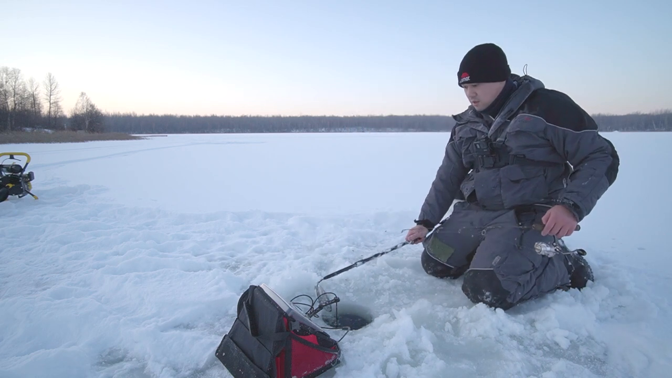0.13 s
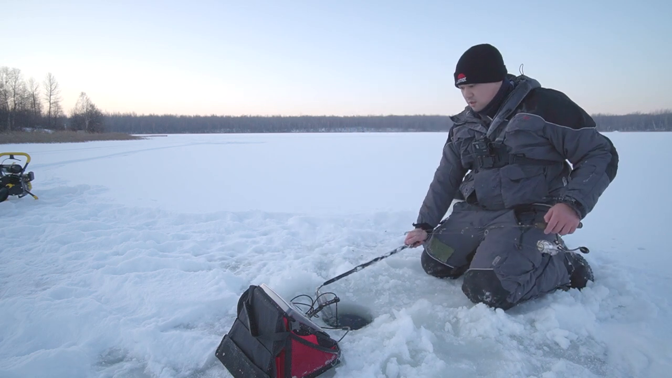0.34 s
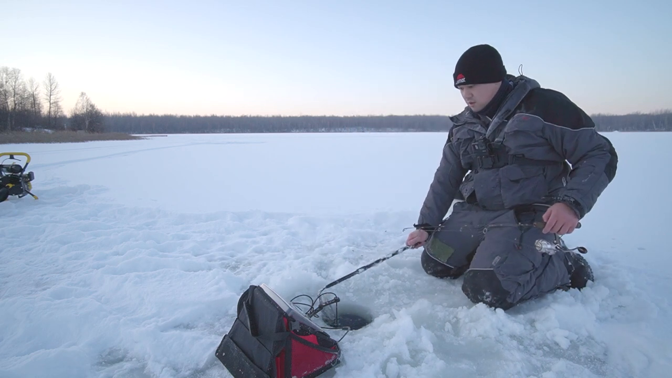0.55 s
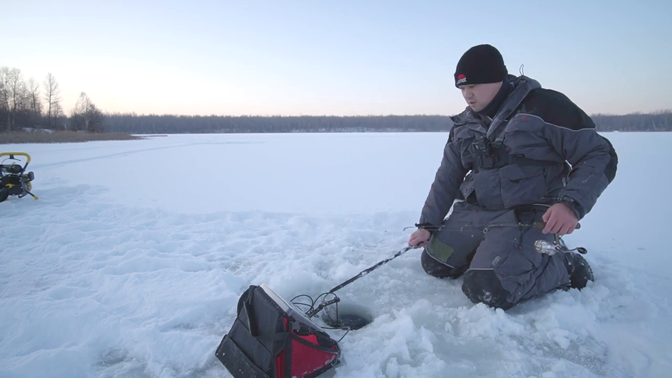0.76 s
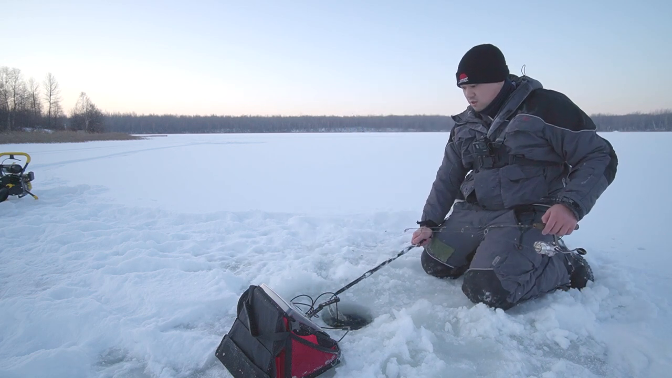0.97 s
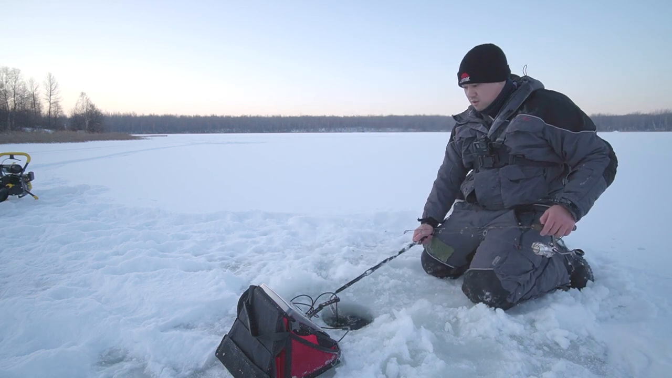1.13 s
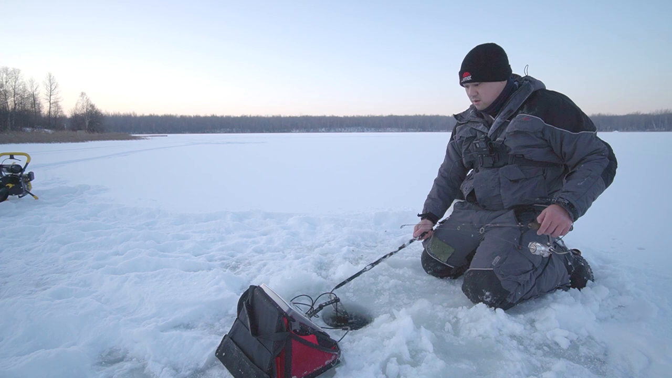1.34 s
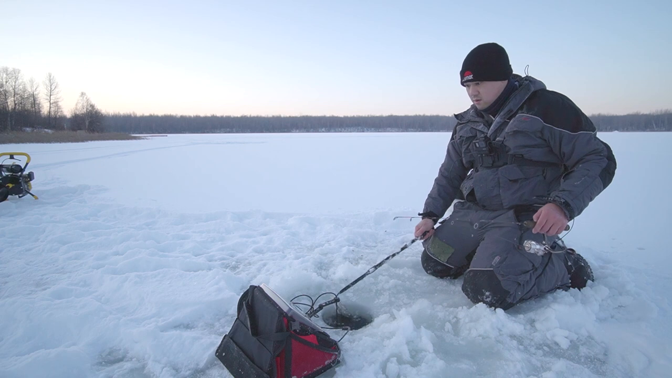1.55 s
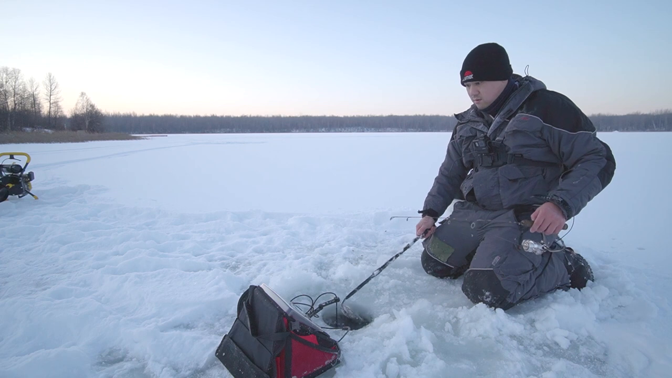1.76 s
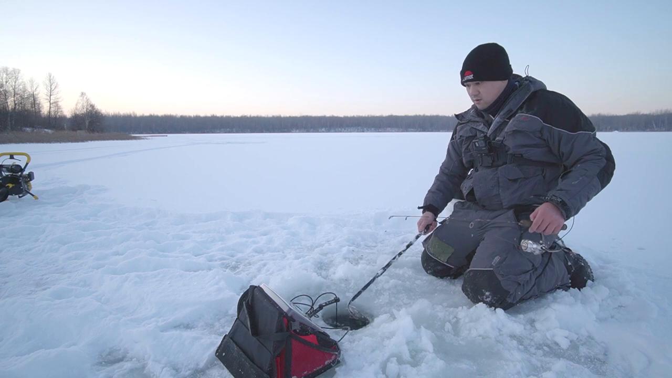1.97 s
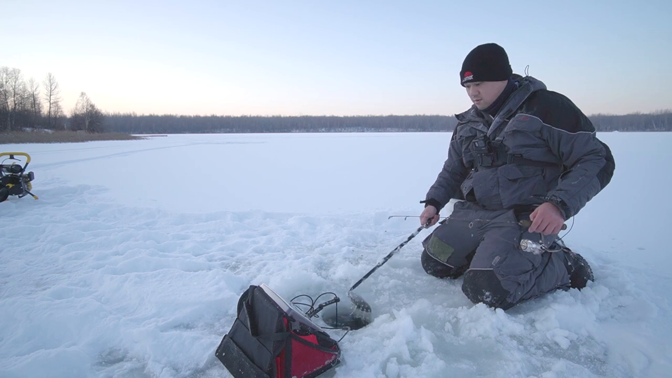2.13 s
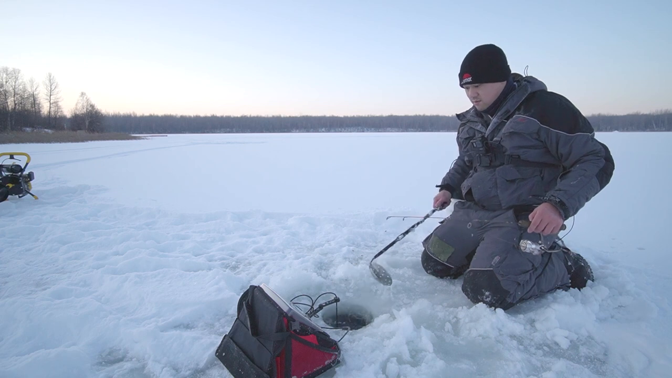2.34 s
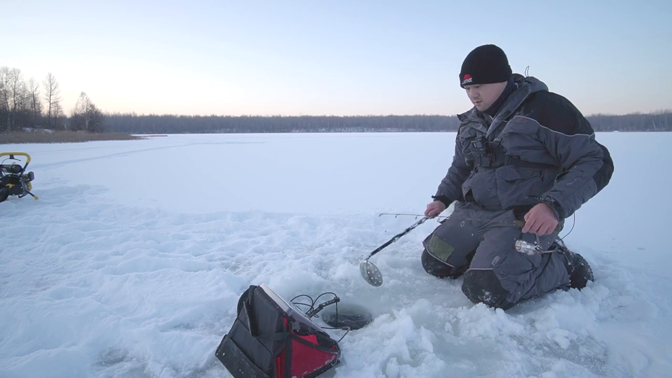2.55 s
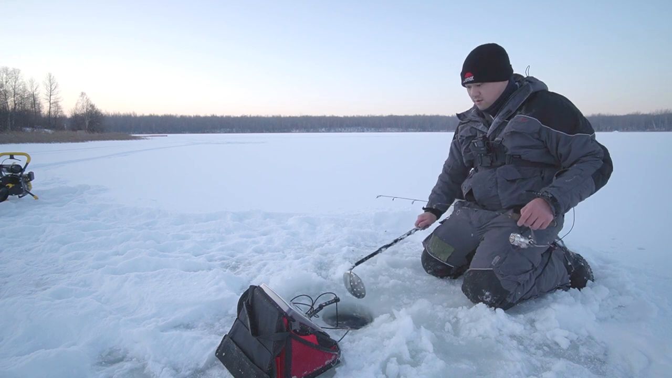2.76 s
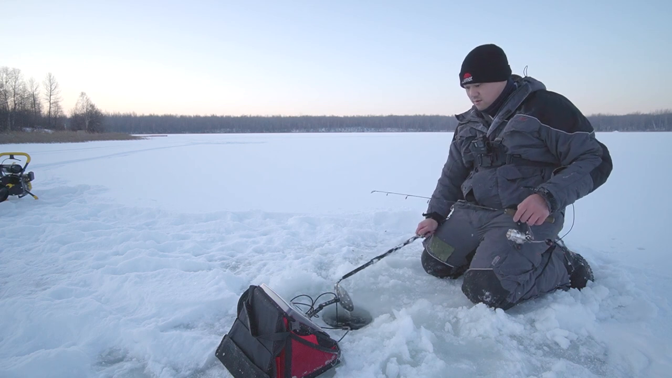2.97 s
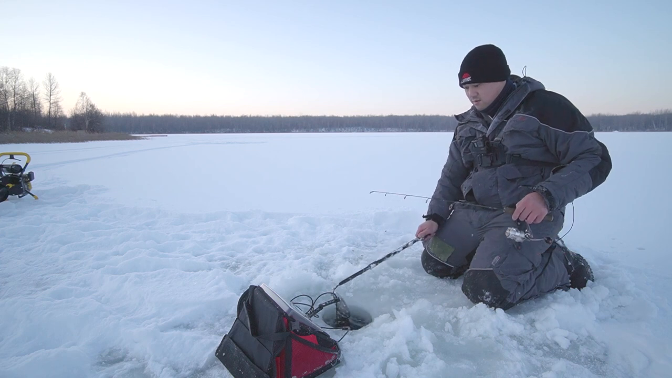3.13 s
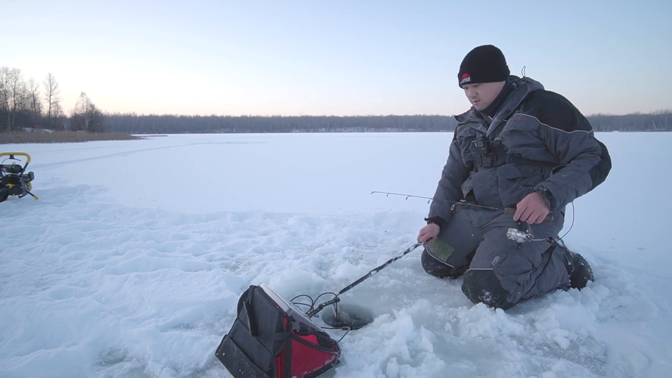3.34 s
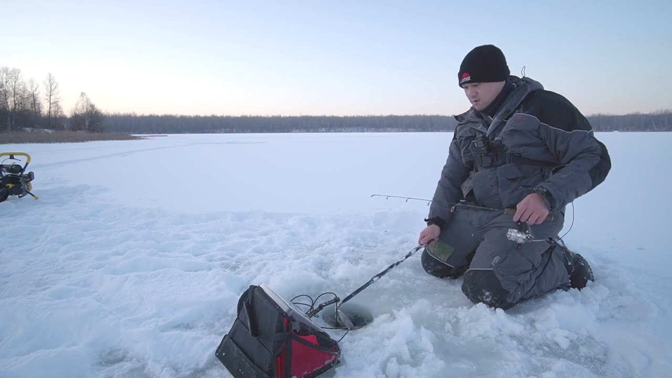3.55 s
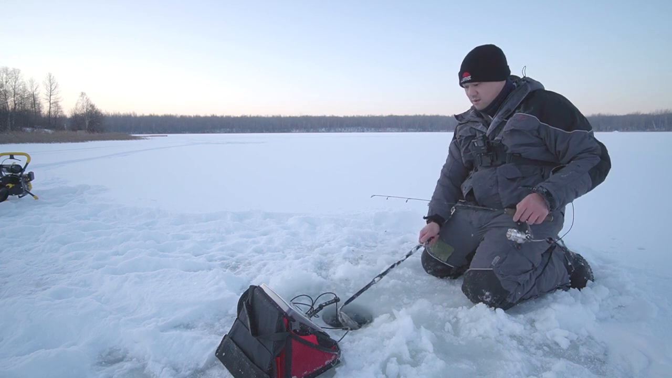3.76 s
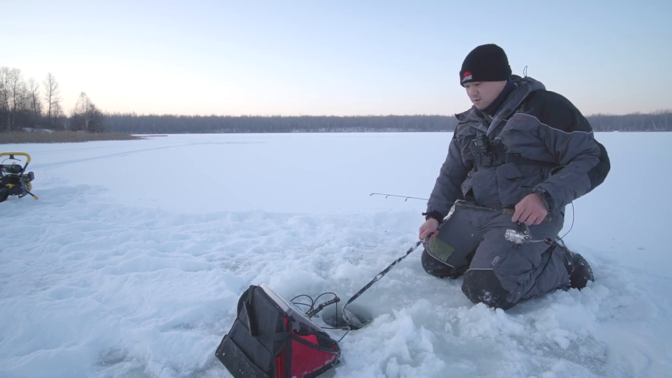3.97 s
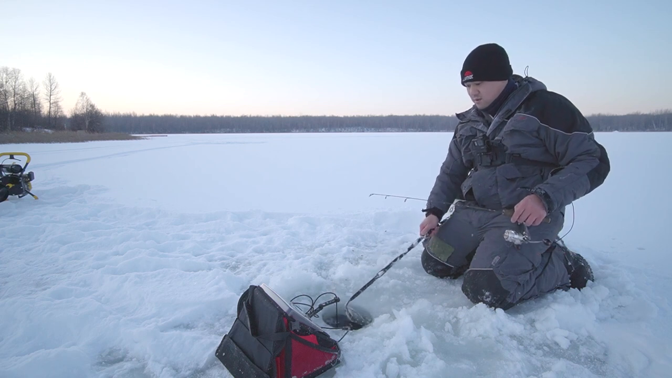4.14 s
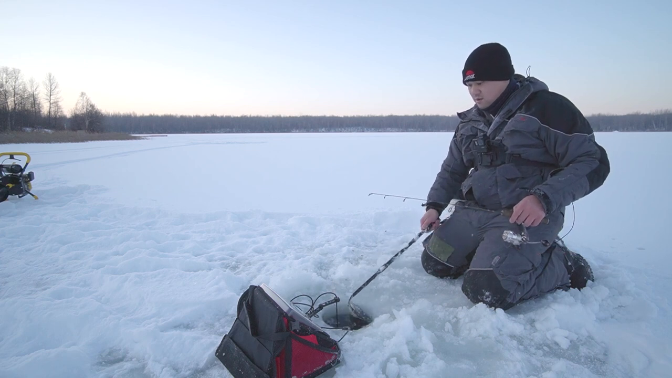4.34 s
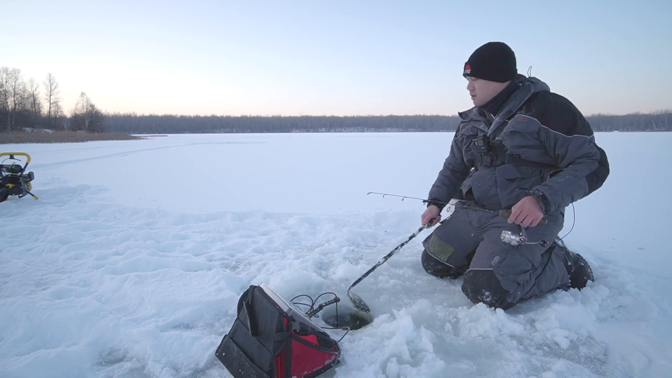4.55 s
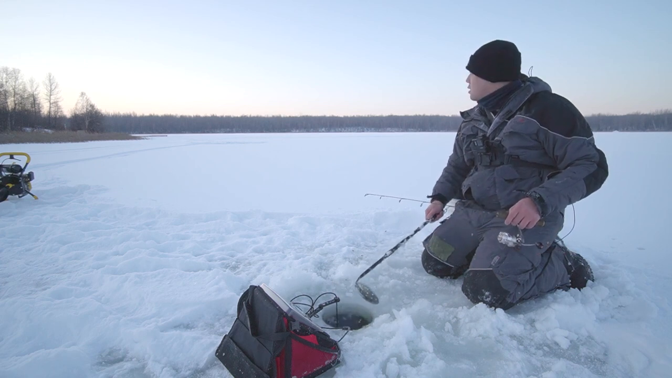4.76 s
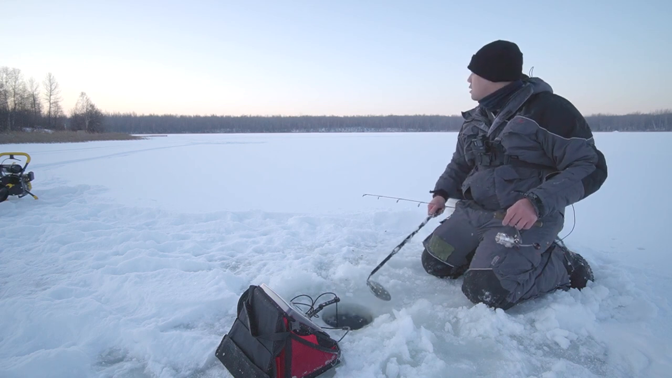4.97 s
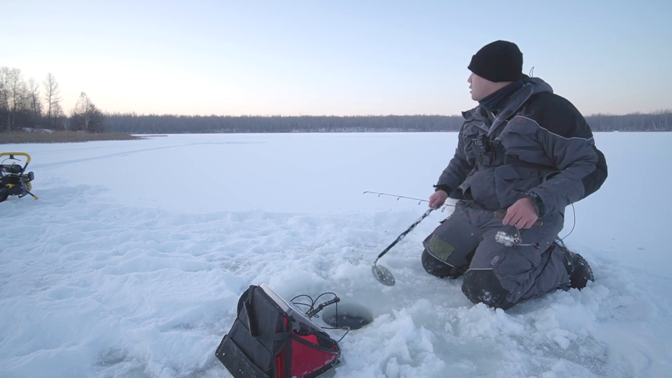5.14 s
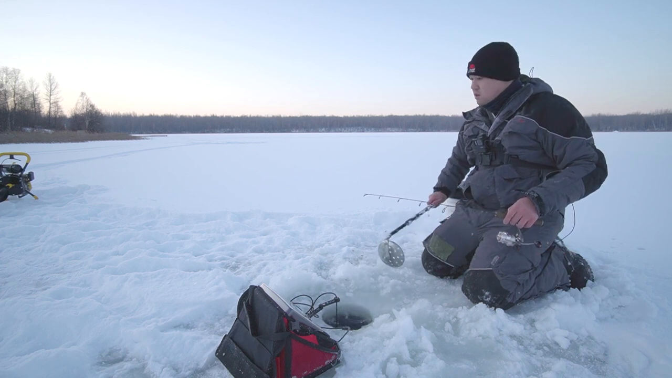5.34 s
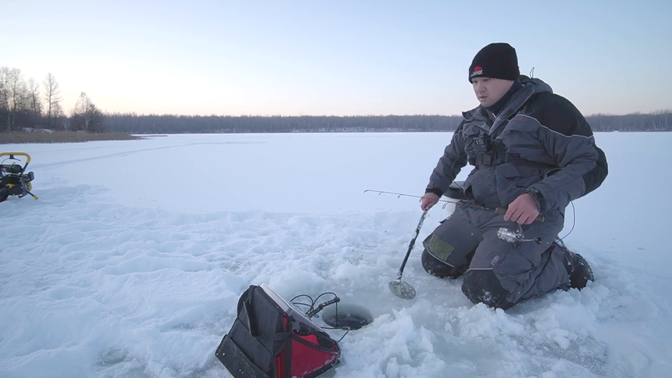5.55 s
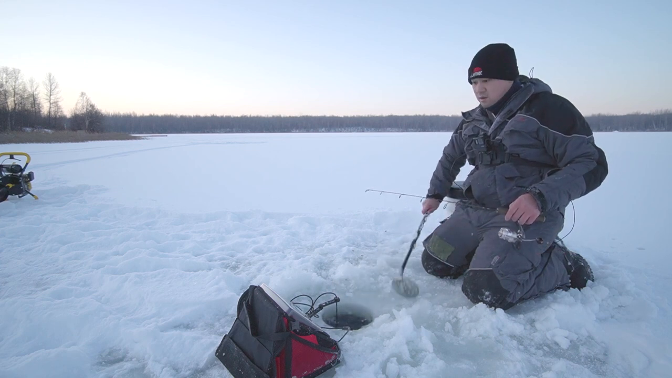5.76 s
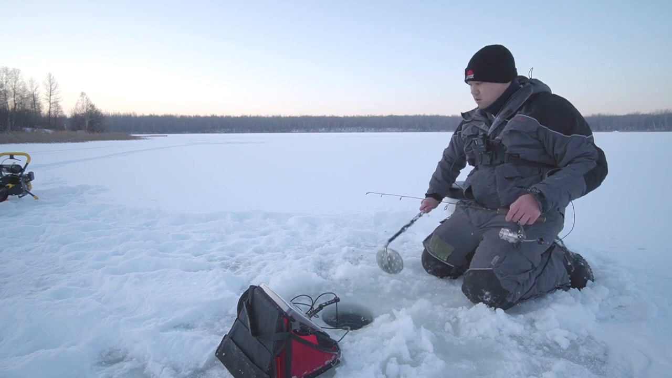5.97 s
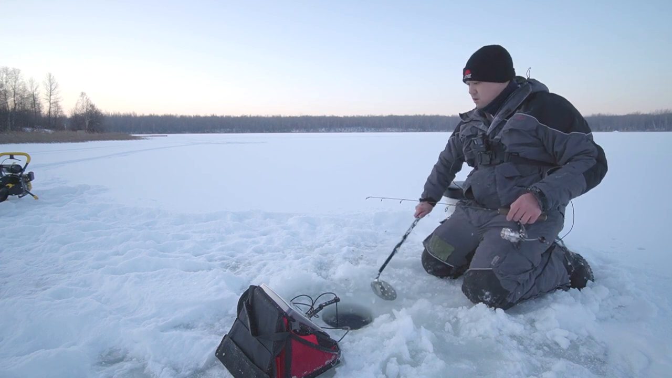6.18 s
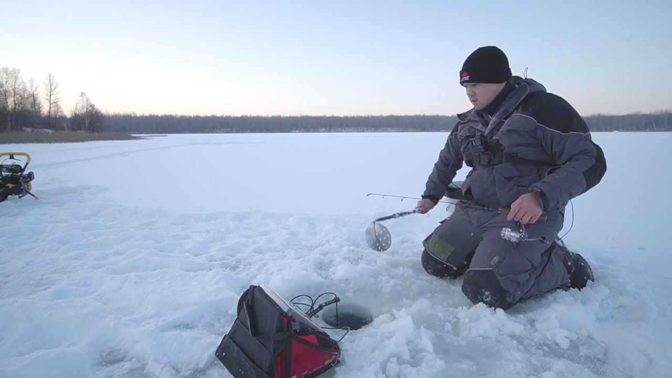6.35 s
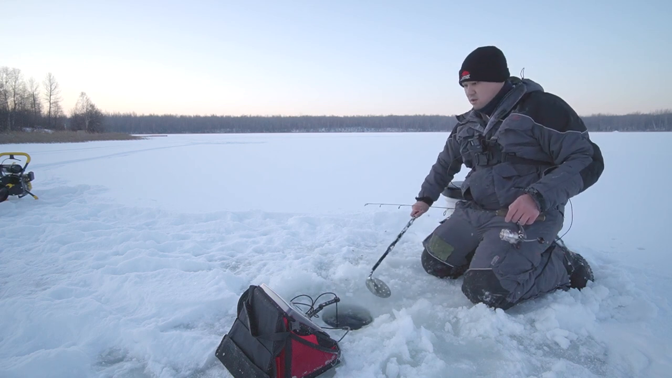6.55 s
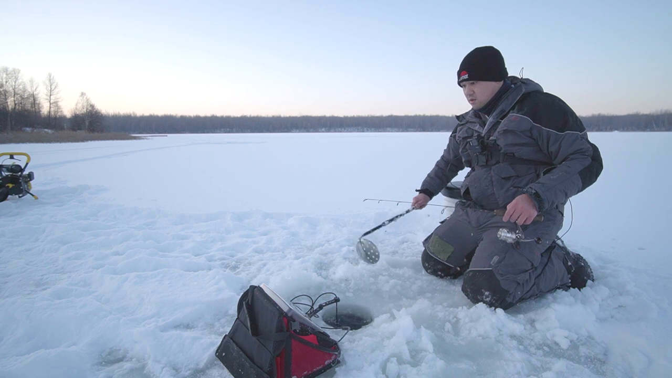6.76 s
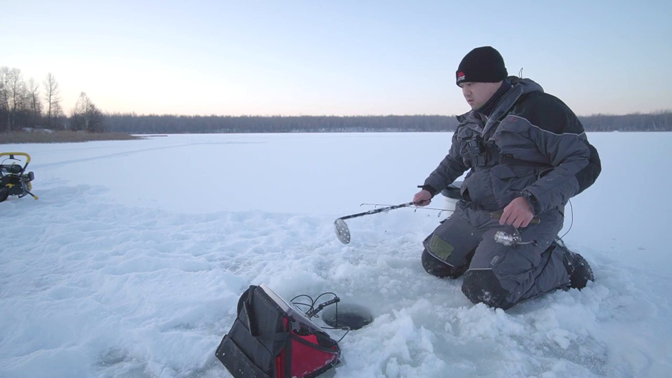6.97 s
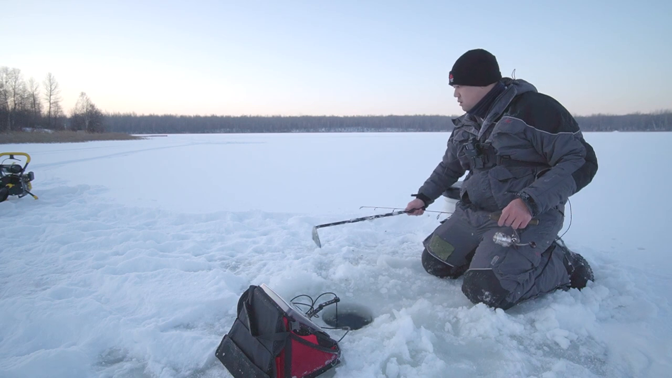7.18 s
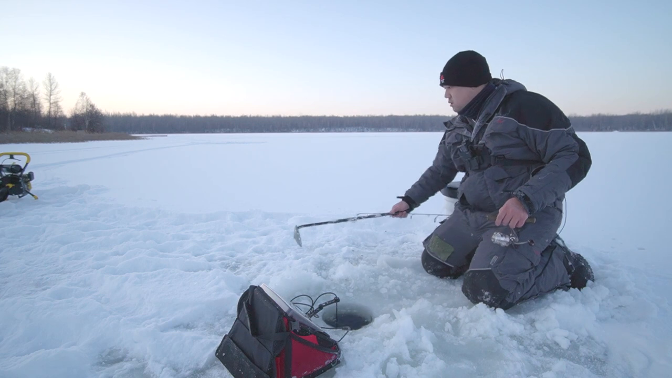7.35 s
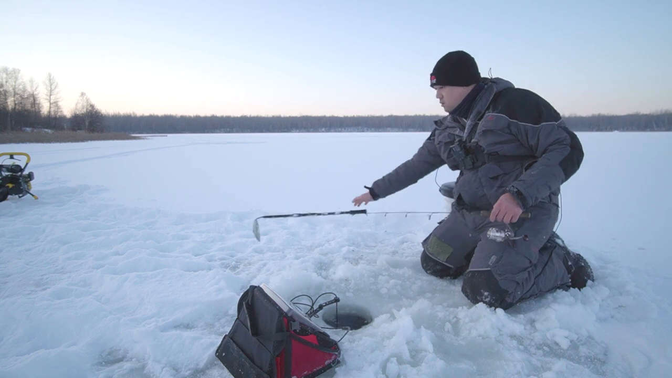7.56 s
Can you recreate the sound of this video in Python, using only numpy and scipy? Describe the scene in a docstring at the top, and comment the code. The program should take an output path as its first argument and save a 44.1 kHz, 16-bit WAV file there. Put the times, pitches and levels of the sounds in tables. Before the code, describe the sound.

A close, dry mono sound in still winter air with faint hiss and soft bass flutter. From 0 to 0.7 s a metal scoop knocks ice in quick clusters, with slush slosh and dull thuds falling in pitch. A short wet pour follows, then sparse ticks and one small drip until about 2 s. At 2.0-2.9 s, solid knocks, a low slosh, a swelling crackly pour, thuds and bubbling drips. Smooth rubbing scrapes run from 3.0 to 3.9 s with strong thumps and a gritty surge near 3.45. It goes nearly quiet around 4.0-4.3, then small ticks return. From 4.9 to 5.5 slush drains in dense crackling chips. Hard crunching blows hit at 5.55, 5.86, 6.2 and 6.55-6.6, the strongest harshly clipped, with brief metal ringing, icy spray and low rumble. Scattered chips fade, a soft rub comes at 7.2, and a thud and final knock arrive at 7.4-7.6.

```python
"""Slush, ice and a metal scoop

A metal skimmer works a fishing hole on a frozen lake. Slush is stirred and poured: many tiny clicks,
hissing spray and low slosh. The scoop knocks ice (short noise bursts through resonances), slides along
it (rubbing noise) and is knocked clean with hard blows (crunching noise and metal ringing) that overload
the recorder. Dull thuds travel through the ice (tones falling in pitch); drips are brief gliding tones.
"""
import sys
import numpy as np
from scipy import signal
from scipy.fft import rfft, irfft
from scipy.io import wavfile
from scipy.ndimage import uniform_filter1d

SR = 44100
rng = np.random.default_rng(int(sys.argv[2]) if len(sys.argv) > 2 else 0)


def master_out(mix):
    """Clip the mix to full scale and print it as 16-bit PCM to the path in sys.argv[1]."""
    frames = np.transpose(np.atleast_2d(mix))
    ceiling = np.clip(frames, -1, 1)
    pcm = np.round(ceiling * 32767).astype(np.int16)
    wavfile.write(sys.argv[1], SR, pcm)


N = 335601  # length [samples]


def amp(db):
    """Turns decibels into an amplitude factor."""
    return 10 ** (np.asarray(db) / 20)


def evened(x):
    """Scales a sound to an average (RMS) size of 1."""
    return x / np.sqrt(np.mean(x ** 2) + 1e-20)


def noise(size):
    """White noise: all pitches at once, equally strong."""
    return rng.standard_normal(size)


def level_over_time(times, levels_db):
    """Joins (time, level) points by straight lines in decibels, for the whole scene."""
    return amp(np.interp(np.arange(N) / SR, times, levels_db))


def add(mix, start_s, sound):
    """Lays a sound into the mix from a given time, cut off at the end of the mix."""
    part = mix[round(start_s * SR):][:len(sound)]
    part += sound[:len(part)]


def band(x, lo_hz, hi_hz, order=2):
    """Keeps the pitches between two limits."""
    edges = [lo_hz, min(hi_hz, .45 * SR)]
    return signal.sosfilt(signal.butter(order, edges, "band", fs=SR, output="sos"), x)


def resonate(x, hz, width_hz):
    """Two-pole resonance, gain 1 at its centre; a narrow one rings longer."""
    return signal.lfilter(*signal.iirpeak(hz, hz / max(width_hz, 5), SR), x)


def colour(x, points):
    """Shapes noise by a spectrum of (Hz, dB) points."""
    point_hz, point_db = np.transpose(points)
    hz = np.fft.rfftfreq(len(x), 1 / SR)
    gain_db = np.interp(np.log(hz + 1), np.log(point_hz + 1), point_db)
    return irfft(rfft(x) * amp(gain_db), len(x))


def lumps(size, span_s):
    """Smooth random wander of average size 1; a longer span makes it slower."""
    width = max(int(span_s * SR), 1)
    return evened(uniform_filter1d(uniform_filter1d(noise(size), width), width))


def grains(lo_hz, hi_hz, per_s, cycles, spread_db, count=24):
    """Short rising tones at random moments: ice bits clicking, small bubbles."""
    happens = rng.random(N) < per_s / SR
    size = amp(spread_db * np.minimum(rng.exponential(1, N), 4)) * happens
    kind, out = rng.integers(0, count, N), np.zeros(N)
    for k, hz in enumerate(np.geomspace(lo_hz, hi_hz, count)):
        u = np.arange(800) / SR * hz / cycles
        tone = np.sin(2 * np.pi * cycles * u * (1 + 0.11 * u))
        out += signal.oaconvolve(size * (kind == k), tone * u * np.exp(-2.5 * u))[:N]
    return evened(out)


def air():
    """Still winter air and recorder hiss: gently wavering noise, with a slow flutter in the bass."""
    # tone of the hiss, only relative as the hiss is evened: (frequency [Hz], density [dB])
    hiss_spectrum = [(12, -31.5), (20, -9), (93, 3.5), (214, -17.5), (521, -17.5), (708, -14.5),
                     (1500, -16.5), (3570, -27), (5270, -27), (12500, -29.5), (15600, -30)]
    # bass flutter: (time [s], level [dB])
    flutter_levels = [(0, -58), (2.3, -75), (2.7, -54), (3.3, -46), (3.7, -56), (5.401, -78), (7.61, -55)]
    hiss_db = -54
    hiss = evened(colour(noise(N), hiss_spectrum)) * amp(1.0 * lumps(N, 0.065))
    flutter = evened(band(noise(N), 20, 71)) * amp(1.5 * lumps(N, 0.12))
    return amp(hiss_db) * hiss + level_over_time(*np.transpose(flutter_levels)) * flutter


def stirring():
    """Loudness of crackle, spray and slosh: the slow stir plus the pours."""
    # slush on the move: (time [s], crackle [dB], treble spray [dB], low slosh [dB])
    stir = [(0, -46, -56.5, -44), (.61, -52.5, -49.5, -53.5), (.89, -57.5, -56.5, -59),
            (1.21, -55.5, -61, -57), (1.97, -65, -61.5, -63), (2.4, -39, -48.5, -46),
            (2.8, -47, -52, -39.5), (3.0, -52, -66, -51), (3.25, -49, -53.5, -48), (3.45, -36, -65, -43),
            (4.0, -70, -68.5, -63), (4.6, -56, -63, -54.5), (4.88, -54, -67, -56.5),
            (5.15, -42.5, -58, -56.5), (5.91, -51, -51.5, -57), (6.55, -53, -44, -53),
            (7.1, -55.5, -58.5, -59), (7.61, -43.5, -66, -40)]
    # pours and showers of slush, whose swell runs from minus half to plus half its value:
    # (start [s], length [s], crackle [dB], treble spray [dB], low slosh [dB], swell [dB])
    pours = [(0.713, .13, -56, -58, -40.5, 25), (2.158, 0.069, -47, -55, -28, 4),
             (2.3, 0.33, -41, -46, -66, 29.5), (2.735, 0.067, -47.5, -68, -57, -3),
             (2.872, 0.056, -46, -79, -38, 0), (4.302, 0.037, -52, -57, -42, 0),
             (4.485, 0.072, -55, -62, -45.5, -3), (4.66, 0.076, -48, -55, -42, 5.5),
             (4.921, .25, -38.5, -45.5, -52.5, -8), (5.555, 0.087, -33.5, -34, -52, -32.5),
             (5.622, 0.1, -72, -44, -63, 2), (6.038, 0.029, -62, -28.5, -72, 3),
             (6.263, 0.13, -48, -48.5, -70, -13), (6.618, 0.16, -44, -49.5, -54, -4)]
    edge_s = 0.026  # fade at both ends of a pour
    times, *columns = np.transpose(stir)
    level = np.array([level_over_time(times, column) for column in columns])
    for start, length, *layer_dbs, swell_db in pours:
        u = np.arange(0, length, 1 / SR)
        fade = np.minimum(np.minimum(u, length - u) / edge_s, 1)
        shape = fade * amp(swell_db * (u / length - .5))
        for layer, db in zip(level, layer_dbs):
            add(layer, start, amp(db) * shape)
    return level


def slush(level):
    """Wet chips crackle and bubble in clumps over a thin wash, with hissing spray and low slosh."""
    clumps = amp(2.2 * lumps(N, .004) + 2.0 * lumps(N, .015))
    wash = evened(band(noise(N), 1480, 3400))
    chips = grains(800, 6000, 2200, 2.0, 4.5)
    bubbles = grains(900, 5000, 200, 5.0, 3.5)
    crackle = evened(clumps * (chips + .7 * wash) + .5 * bubbles)
    spray_hiss = evened(band(noise(N), 2800, 15000))
    spray_grains = grains(2260, 24800, 2200, 1.2, 2.3)
    spray = evened(clumps * (spray_hiss + 1.84 * spray_grains))
    slosh = grains(171.0, 680, 300, 1.5, 3.66)
    return (level * [crackle, spray, slosh]).sum(0)


def thuds():
    """Bending waves in the ice outrun their own bass, so each thud falls in pitch."""
    # thuds through the ice: (time [s], level [dB])
    thud_list = [(0.071, -20.5), (0.323, -23.5), (0.573, -25.5), (2.502, -19), (2.59, -19), (2.67, -23),
                 (2.709, -28), (2.782, -20.5), (3.059, -24), (3.093, -16), (3.131, -26), (3.382, -14.5),
                 (3.662, -18.5), (3.713, -26), (3.948, -22.5), (5.309, -27), (5.813, -23), (6.103, -31.5),
                 (6.342, -24.5), (6.614, -12), (6.886, -17), (7.158, -29.5), (7.275, -32), (7.411, -12.5)]
    final_hz, ring_s = 94.3, 0.11  # ring_s: time to fade by 60 dB
    out, t = np.zeros(N), np.arange(8192) / SR
    turns = np.cumsum(final_hz * (1 + 6.2 * np.exp(-t / 0.0032))) / SR
    soft_start = 1 - np.exp(-(t / 0.0056) ** 3)
    thud = amp(-60 * t / ring_s) * np.sin(2 * np.pi * turns) * soft_start
    for start, db in thud_list:
        add(out, start, amp(db) * thud)
    return out


def knock(hz, treble_db, rise_s):
    """A short swell of breaking ice, coloured by the size of what is hit."""
    grit_db = 4.5  # unevenness of the burst
    u = np.arange(2048) / SR / max(rise_s, .0003)
    swell = (u * np.exp(1 - u)) ** 0.88
    burst = noise(len(u)) * amp(grit_db * lumps(len(u), .0007)) * swell
    body = resonate(resonate(burst, hz, max(650, .35 * hz)), hz, 2000)
    body += .15 * band(burst, 300, 1200 + 2 * hz)
    treble = band(burst, 2070, 15000)
    return body / abs(body).max() + amp(treble_db) * treble / abs(treble).max()


def knocks(crackle, count=70):
    """The loud knocks, then loose chips that tick at random, louder where the slush is busy."""
    # scoop or chips strike ice: (time [s], peak of the body [dB], centre [Hz], treble re body [dB])
    strikes = [(0.234, -11, 2060, -4), (0.242, -6.5, 2360, -36), (0.293, -23.5, 510, -23.5),
               (0.381, -8, 2076, -6), (0.391, -10.5, 1930, -7.5), (0.397, -12.5, 2000, -6),
               (0.431, -15.5, 2050, -10), (0.442, -18.5, 1730, -16), (0.455, -10, 456, -10.5),
               (0.521, -14.5, 2130, -8), (0.528, -10, 2000, -18), (0.557, -13, 2180, -6),
               (0.569, -19.5, 2060, -15), (0.602, -29, 2000, -2), (0.612, -20, 2217, -14.5),
               (0.637, -18.5, 2180, -12), (0.658, -16.5, 2050, -8.5), (0.681, -22, 1954, -5),
               (0.702, -28.5, 1718, -8), (0.832, -26.5, 1570, -10), (0.899, -32, 3360, -11),
               (0.948, -35.5, 1451, -22), (1.091, -26.5, 1675, -23), (1.109, -29.5, 3521, 4),
               (1.347, -34.5, 443, -23), (1.997, -11.5, 470, -25), (2.116, -29.5, 955, -15),
               (2.169, -7, 940, -13.5), (2.187, -13.5, 970, -17), (2.203, -19, 1100, -30),
               (2.219, -20, 1150, -25), (2.435, -21, 2340, -20), (2.514, -15.5, 2300, -20),
               (2.561, -14, 2340, -17), (2.589, -20, 3200, -14), (2.89, -24, 628, -24.5),
               (2.906, -24, 1100, -17), (3.465, -22, 1350, -17), (3.687, -31.5, 1102, -2.5),
               (4.311, -32.5, 1400, 2), (4.497, -36, 3720, 2), (4.54, -26.5, 2150, -5),
               (4.638, -34.5, 2810, -18), (4.667, -31, 570, -22), (4.693, -25.5, 1110, 3),
               (4.706, -21, 1220, -23), (4.78, -35, 1353, -23.5), (4.894, -26.5, 1900, -9),
               (4.911, -19, 1320, -6.5), (4.94, -14, 1390, -22), (4.954, -14, 1820, -33),
               (4.987, -21, 3500, -15), (4.998, -20, 2100, -6), (5.031, -20.5, 1760, 6),
               (5.082, -21.5, 2580, -13), (5.113, -19.5, 3200, -4), (5.148, -24, 1390, -19),
               (5.212, -24.5, 1880, -5.5), (5.304, -20, 2880, -25), (5.312, -23, 3520, -3.5),
               (5.37, -25, 2960, -14), (5.41, -25.5, 3250, -16), (5.457, -29, 1410, 3.5),
               (5.484, -27, 1340, -8), (5.751, -47, 1513, -8), (5.81, -24, 1370, -1.5),
               (5.879, -10, 1020, 3), (5.935, -18.5, 1570, -6), (6.02, -28, 2300, -2),
               (6.048, -28, 3481, -11), (6.216, -3.5, 2480, -4.5), (6.429, -35, 1492, -11.5),
               (6.461, -25.5, 840, -3), (6.567, -3.5, 2200, -17), (6.621, -13.5, 2190, 2),
               (6.726, -22.5, 3200, -5), (6.743, -22, 1260, -23), (6.769, -29, 945, -25.5),
               (6.92, -30, 3777, 9), (7.4, -27, 474, -24), (7.545, -20.5, 1350, -15),
               (7.562, -30, 1320, -30), (7.577, -8.5, 1430, -13)]
    knock_rise_s, chip_rise_s = 0.0027, 0.0014
    chip_lo_hz, chip_hi_hz, chip_treble_db = 850, 4100, -6
    # chip level where the crackle is at busy_db; follow sets how closely chips track the crackle
    chip_db, chip_spread_db, busy_db, follow = -37.5, 2.5, -50, .6
    out = np.zeros(N)
    for start, db, hz, treble_db in strikes:
        add(out, start, amp(db) * knock(hz, treble_db, knock_rise_s))
    for when, size, force in rng.random((count, 3)):
        hz = chip_lo_hz * (chip_hi_hz / chip_lo_hz) ** size
        db = chip_db - chip_spread_db * np.log(force + 0.03)
        busy = (crackle[int(when * N)] / amp(busy_db)) ** follow
        add(out, when * N / SR, busy * amp(db) * knock(hz, chip_treble_db, chip_rise_s))
    return out


def drips():
    """A drop lands with a tick; its bubble wobbles and glides in pitch as it rises or is squeezed."""
    # drips and gulps, each fading by 60 dB in its ring time:
    # (time [s], level [dB], starting pitch [Hz], ring time [s], glide [octaves/s])
    drip_list = [(0.453, -18.5, 409, 0.1, -12.5), (1.409, -17, 2980, 0.011, 11),
                 (2.345, -28, 1040, 0.029, 3), (2.384, -20, 1245, 0.047, 1), (2.635, -32.5, 880, 0.72, 6.5),
                 (2.7, -22, 7400, 0.01119, 6), (2.708, -18, 2770, 0.027, 25),
                 (2.786, -31.5, 4950, 0.027, -14), (5.239, -30, 426, 0.025, 12),
                 (5.392, -8.5, 3520, 0.0079, -3), (6.358, -25, 1500, 0.034, 5),
                 (6.441, -18, 3620, 0.013, 9), (7.267, -32, 1017, 0.088, -9)]
    out, t = np.zeros(N), np.arange(3200) / SR
    for start, db, hz, ring_s, glide in drip_list:
        wobble = .04 * lumps(len(t), .002)
        flutter_db = 4 * lumps(len(t), .002)
        turns = np.cumsum(hz * 2 ** (glide * t) * (1 + wobble)) / SR
        bubble = amp(flutter_db - 60 * t / ring_s) * np.sin(2 * np.pi * turns)
        bubble *= signal.windows.tukey(len(t), .04)  # soft ends
        tick = 0.26 * band(noise(len(t)), 0.082 * hz, 3 * hz, order=1) * np.exp(-t / 0.00084)
        add(out, start, amp(db) * (bubble + tick))
    return out


def slides():
    """A smooth rubbing hiss passes the resonances of scoop and hole."""
    # low, middle and high resonance: (centre [Hz], width of the narrower filter [Hz], gain [dB])
    resonances = [(1350, 580, 32.5), (2340, 760, 14.5), (4050, 500, 1)]
    # slides along the ice: (start [s], attack [s], hold [s], release [s], level [dB],
    # lift of the middle resonance [dB], hiss re level [dB])
    strokes = [(3.01, 0.056, 0.14, .004, -41, 16, -19), (3.259, 0.087, 0.13, 0.23, -38, 8, -9),
               (3.659, 0.024, 0.24, .04, -55.5, 5, -20.5), (6.074, .01, 0.11, 0.14, -52, -4, -18.5),
               (7.19, 0.1, 0.013, .06, -50, 8.5, -5)]
    out = np.zeros(N)
    for start, attack, hold, release, level_db, lift_db, hiss_db in strokes:
        t = np.arange(0, attack + hold + release, 1 / SR)
        shape = np.clip(np.minimum(t / attack, (t[-1] - t) / release), 0, 1)
        rub = noise(len(t)) * amp(1.2 * lumps(len(t), 0.0046))
        low, middle, high = (amp(db) * resonate(resonate(rub, hz, width), hz, 3 * width)
                             for hz, width, db in resonances)
        # the level is that of the low resonance
        body = (low + amp(lift_db) * middle + high) / low.std()
        hiss = amp(hiss_db) * evened(band(rub, 5600, 14300))
        add(out, start, amp(level_db) * (body + hiss) * shape)
    return out


def blows():
    """The scoop crushes the crust for some milliseconds and rings; the sheet below thumps, then rolls slowly."""
    # hard blows and their rebounds, crunch level before the final mix:
    # (time [s], crunch level [dB], rise [s], crunch length [s], shake of the ice [dB])
    hits = [(5.552, -6.5, 0.00071, 0.012, -35), (5.862, -2, 0.0092, 0.012, -31.5),
            (6.201, 6, 0.00038, 0.0049, -34.5), (6.248, -16, 0.0036, .012, -43),
            (6.606, -12, 0.0058, 0.0093, -37), (6.553, 6, 0.0027, 0.0086, -23)]
    # tone of the crunch, only relative as it is evened: (frequency [Hz], density [dB])
    crunch_spectrum = [(59, -58), (100, 5), (699, -2), (1040, 4.5), (1320, 0.5), (2010, 4.5), (2820, 2.5),
                       (3270, 6), (4040, -2), (7300, 3), (15600, -10.5)]
    # the scoop rings, levels before the final mix; filter width is 1.5 / ring setting:
    # (pitch [Hz], level [dB], ring setting [s])
    scoop_modes = [(1028, -7, .02), (1545, -12, .02), (1983, -7, .025), (2600, -10, .02), (3085, -11, .025),
                   (3305, -9, .02), (3590, -11, .02), (4700, -11, .02), (6400, -14, .02), (7390, -14, .02)]
    crunches, sheet, t = np.zeros(N), np.zeros(N), np.arange(16384) / SR
    for start, db, rise, length, shake_db in hits:
        fade = amp(-60 * np.maximum(t - length, 0) / .022)
        shape = fade * np.minimum(t / rise, 1) ** 2
        add(crunches, start, amp(db) * shape * evened(colour(noise(len(t)), crunch_spectrum)))
        thump = amp(18.0 - 60 * t / 0.075) * evened(band(noise(len(t)), 160, 323))
        roll = amp(-60 * t / 0.57) * evened(band(noise(len(t)), 22.4, 84))
        add(sheet, start, amp(shake_db) * (thump + roll) * np.minimum(t / 0.013, 1))
    ring = sum(amp(db) * resonate(crunches, hz, 1.5 / ring_s) for hz, db, ring_s in scoop_modes)
    return 0.63 * crunches + 1.54 * ring + sheet


def scene():
    """Adds all layers into one channel."""
    level = stirring()
    crackle_level = level[0]
    mix = air() + slush(level) + thuds() + knocks(crackle_level) + drips() + slides() + blows()
    return mix[None]


def record(dry):
    """Hard clipping at full scale, then the band limit of the recorder."""
    edge_hz = 15800
    clipped = np.clip(dry, -1, 1)
    lowpass = signal.firwin(511, edge_hz, window=("kaiser", 9), fs=SR)
    return signal.oaconvolve(clipped, lowpass[None], "same")


dry = scene()
out = record(dry)
master_out(out)
```